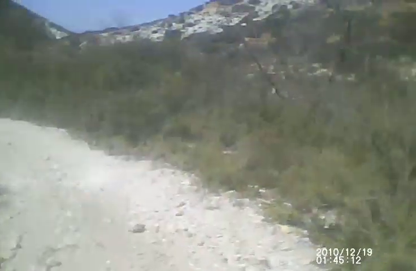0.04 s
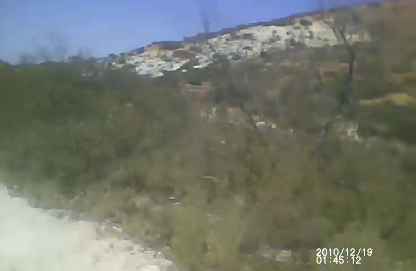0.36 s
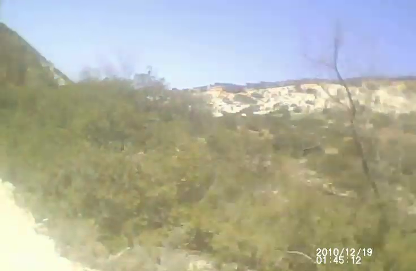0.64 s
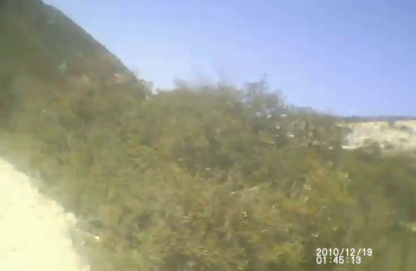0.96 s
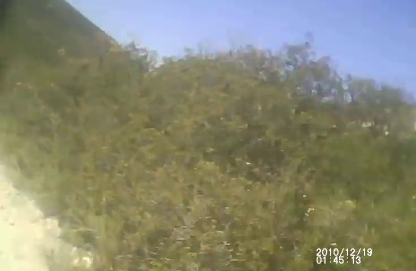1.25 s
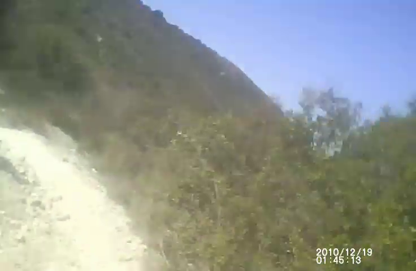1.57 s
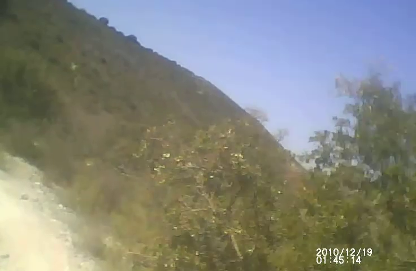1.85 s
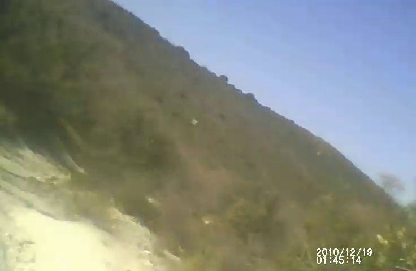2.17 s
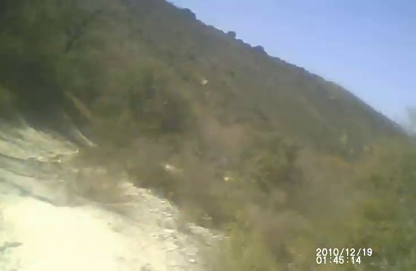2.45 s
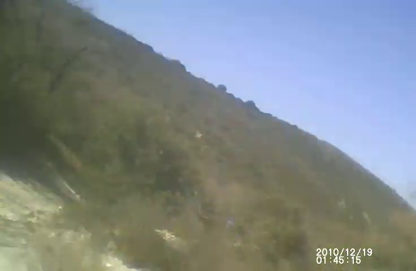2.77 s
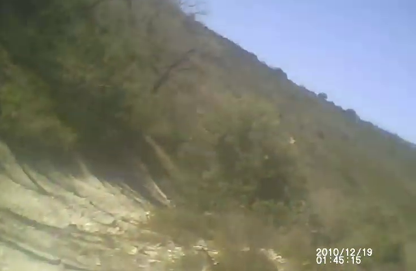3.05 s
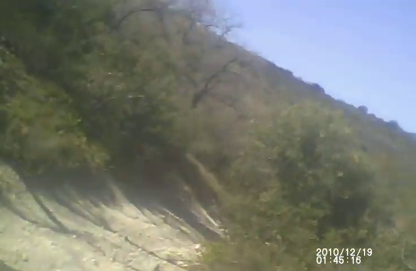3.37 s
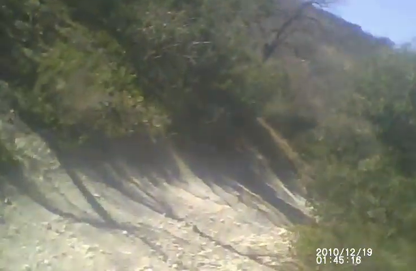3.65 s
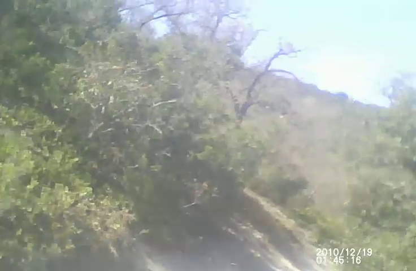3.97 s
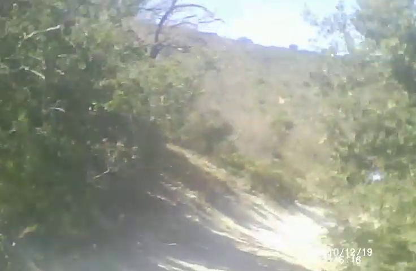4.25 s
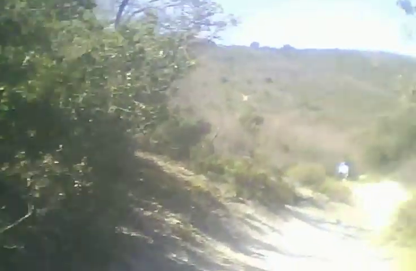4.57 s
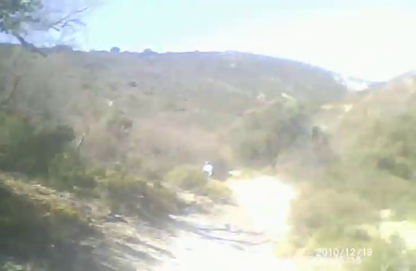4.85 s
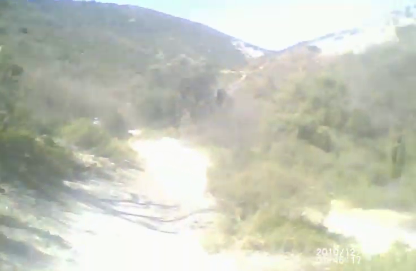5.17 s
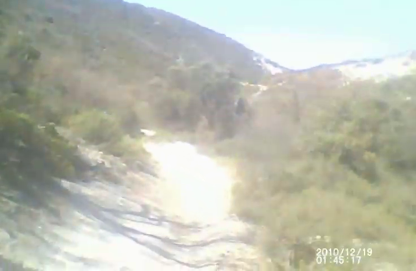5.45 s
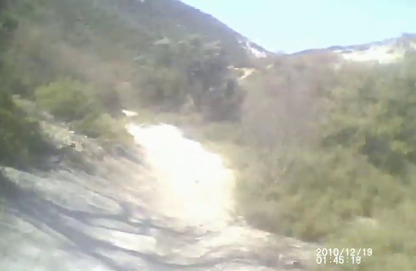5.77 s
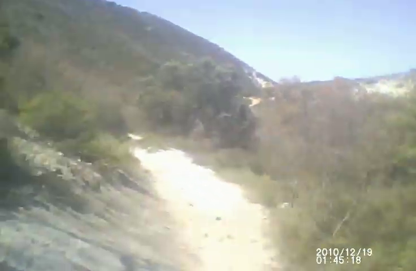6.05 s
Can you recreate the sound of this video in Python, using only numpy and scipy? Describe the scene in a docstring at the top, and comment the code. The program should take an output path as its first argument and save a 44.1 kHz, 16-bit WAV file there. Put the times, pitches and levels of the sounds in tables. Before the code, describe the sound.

A bike rolls down a rocky trail for about six seconds, heard from a small camera fixed to it. From the start, loose parts chatter rapidly against the hollow housing, mixed with tiny metal ticks. The shaking mount adds a low, boxy drone, and faint wind rushes steadily behind. Stones give sharp, irregular knocks several times a second, each a clack with a brief ring and scrape; strong ones land around 0.4, 2.1, 2.8, 4.4 and 5.5 seconds. The rattle is busy through the first second and a half, thins just before 2 seconds, then builds again. At about 3.4 seconds the sound drops out for a split second. After a short easing around 5 seconds, the drone and clatter grow, with the hardest jolt near 6 seconds. The microphone is close, narrow in tone and overdriven, so the bumps crackle.

```python
"""A crackling rattle over a low drone: a bike rolls down a rocky trail with a small camera fixed to it.
Loose parts chatter against the housing, single stones give sharper knocks, and the shaking mount drones.
Rough patches shake mount and parts harder for a moment, while wind rushes over the microphone.
The narrow-band microphone stage is overdriven, so the jolts crackle. Once, the sound briefly drops out."""
import sys
import numpy as np
from scipy import signal
from scipy.fft import rfft, irfft, next_fast_len
from scipy.io import wavfile
from scipy.ndimage import uniform_filter1d, map_coordinates

SR = 44100
rng = np.random.default_rng(int(sys.argv[2]) if len(sys.argv) > 2 else 0)


def pcm_store(signal):
    """Save signal as 16-bit PCM."""
    levels = np.round(np.clip(np.atleast_2d(signal), -1, 1) * 32767)
    wavfile.write(sys.argv[1], SR, levels.astype(np.int16).T)


N = 269892


# The housing's hollow answer to a tap. Each row: frequency in Hz, relative level in dB.
HOUSING_SPECTRUM = [(200, -36.5), (450, -3), (630, 4.5), (950, 2.5), (1150, -0.5), (1450, -10),
                    (1950, -8.5), (2350, -19), (2650, -14), (2900, -25), (3500, -21.5), (4100, -43)]

def chatter(level_db, taps_per_s, scatter_db, contact_s, count=4000):
    """Loose parts tap the housing at uneven intervals, each tap a short scuff."""
    spacing, force = rng.random((count, 2)).T
    at = (np.cumsum(.15 + 1.7 * spacing) / taps_per_s * SR).astype(int)
    energy = amp(scatter_db * (2 * force - 1)) ** 2
    taps = np.bincount(at[at < N], energy[at < N], N)
    decay = np.exp(-2 / (contact_s * SR))
    scuffs = np.sqrt(signal.lfilter([1], [1, -decay], taps))
    pushes = shifting_colour(scuffs * rng.standard_normal(N), depth_db=7)
    return amp(level_db) * unit(ring(pushes, HOUSING_SPECTRUM))


def shifting_colour(x, depth_db, size=256):
    """Each tap lands on another spot, so the colour changes from one to the next."""
    spectra = signal.stft(x, nperseg=size)[2]
    colour = uniform_filter1d(rng.standard_normal(spectra.shape), size=4, axis=0)
    colour = uniform_filter1d(colour, size=2, axis=1)
    return signal.istft(spectra * amp(depth_db * np.tanh(unit(colour))), nperseg=size)[1][:N]


def frame_pings(level_db, ticks_per_s, centre_hz, spread, scatter_db, t60_s, count=600):
    """Small metal parts tick against the frame, each ringing briefly at its own pitch."""
    spacing, pitch, softness = rng.random((count, 3)).T
    times = np.cumsum(-np.log(1 - spacing)) / ticks_per_s
    t = np.arange(SR // 20) / SR
    hz = centre_hz * np.exp(spread * (2 * pitch[:, None] - 1))
    ticks = amp(-scatter_db * softness[:, None] - 60 * t / t60_s) * np.sin(2 * np.pi * hz * t)
    at = (times[:, None] * SR).astype(int) + np.arange(len(t))
    return amp(level_db) * unit(np.bincount(at[at < N], ticks[at < N], N))


# Rough ground under the wheels. Each row: start in seconds, length in seconds,
# relative rattle level in dB, relative mount sway in dB.
ROUGH_PATCHES = [(0.039, 0.12, -4.5, -5.5), (0.268, 0.026, -6, -10.5), (0.322, 0.12, -1, -2),
                 (0.513, 0.16, -10, -7), (0.711, 0.085, -8.5, -6.5), (0.983, 0.14, -6, -1),
                 (1.145, 0.047, -2.5, -7.5), (1.266, 0.05, -5.5, -6), (1.465, 0.037, -7, -9),
                 (1.546, 0.13, -12.5, -21.5), (1.82, 0.041, -19.5, -8), (1.914, 0.017, -8, -17),
                 (2.097, 0.027, -10.5, -10.5), (2.221, 0.036, -8.5, -16.5), (2.42, 0.048, -7.5, -8.5),
                 (2.512, 0.1, -6.5, -8.5), (2.737, 0.2, -7.5, -5.5), (2.953, 0.062, -15, -5),
                 (3.138, 0.035, -11.5, -9.5), (3.325, 0.041, -5.5, -11.5), (3.445, 0.155, -5.5, -7),
                 (3.652, 0.045, -9, -14), (3.885, 0.0061, -4, -12.5), (3.917, 0.027, -14.5, -3.5),
                 (4.02, 0.13, -5, -5.5), (4.219, 0.245, -6.5, -7.5), (4.6, 0.074, -4.5, -4.5),
                 (4.759, 0.11, -15, -4.5), (5.2, 0.018, -10, -7), (5.286, 0.027, -7.5, -12.5),
                 (5.419, 0.069, -8, -9), (5.495, 0.066, -2, -3), (5.647, 0.066, -5, -8.5),
                 (5.797, 0.035, -5, -11.5), (5.939, 0.085, 1.5, 2)]

def jolts(levels_db, attack_s=0.0078, release_s=0.011):
    """Strength of the rough patches: each takes hold, lasts for its length and dies away."""
    t = np.arange(N) / SR
    strength = np.zeros(N)
    for (start, length, *_), db in zip(ROUGH_PATCHES, levels_db):
        attack = np.clip((t - start) / attack_s + .5, 0, 1)
        release = np.exp(-np.maximum(t - start - length, 0) / release_s)
        strength = np.maximum(strength, amp(db) * attack * release)
    return strength


# The bed of rattle between bumps. Each row: time in seconds, relative level in dB.
RATTLE_BED = [(0.0, -10), (0.34, -14), (0.49, -13.5), (1.1, -15.5), (1.88, -20), (2.7, -10), (3.25, -16),
              (3.57, -13), (3.89, -14.5), (4.25, -10), (4.98, -19), (5.5, -8.5), (5.91, -16.5),
              (6.1, -12.5)]

def jostle(steady_db):
    """How hard the loose parts are thrown about: the trail's steady grain plus its rough patches."""
    rattle_db = np.array(ROUGH_PATCHES)[:, 2]
    return np.hypot(amp(curve(RATTLE_BED) + steady_db), jolts(rattle_db))


# The bite of hard edges scraping. Each row: frequency in Hz, relative level in dB.
SCRAPE_SPECTRUM = [(600, -44), (1400, 3.5), (2000, 4.5), (2700, 3.5), (3100, -6), (4000, -13)]
# Single stone hits. Each row: start in seconds, relative level of clack and ring in dB,
# ring pitch in Hz, relative scrape level in dB.
STONE_HITS = [(0.032, -3.5, 620, -5.5), (0.095, -3.5, 830, -0.5), (0.201, -4.5, 830, -15),
              (0.412, -1, 780, 2), (0.573, -0.5, 892, -10.5), (0.673, -14.5, 870, -12),
              (0.756, -4.5, 620, -13), (0.881, -12, 1200, -9.5), (0.943, -11.5, 790, -10),
              (0.994, -4.5, 894, -11), (1.152, -3, 734, -5), (1.277, -3, 708, -17), (1.351, -8.5, 672, -24),
              (1.55, -10, 626, -21), (1.908, 0.5, 937, -17), (2.036, -6.5, 946, -4),
              (2.093, 3.5, 1152, -6.5), (2.221, -2, 884, -17.5), (2.46, -8, 1010, 2.5),
              (2.808, -1.5, 763, -4.5), (3.177, -6.5, 727, -4), (3.368, -3.5, 1167, -12),
              (3.428, -6, 976, -14.5), (3.837, -3.5, 690, -16.5), (3.887, -1, 685, -12),
              (3.939, -2, 590, -17.5), (4.02, -3.5, 700, -6.5), (4.124, -8.5, 658, -12.5),
              (4.209, -4.5, 923, -8.5), (4.424, -4, 795, 2), (4.525, -0.5, 830, -14.5),
              (4.71, -7.5, 878, -30), (4.769, -6.5, 690, -17.5), (4.852, -5, 686, -23),
              (4.944, -6, 946, -18.5), (5.094, -8, 713, -24), (5.136, -6, 963, -17.5),
              (5.381, -4, 716, -11), (5.538, 0.5, 696, -1), (5.779, -7.5, 1014, -16),
              (5.979, -8.5, 940, 8.5)]

def stone_knocks(clack_db, tone_db, scrape_db, attack_s, t60_s):
    """A stone slams the parts together: a clack of the housing, a brief ring and a bright scrape."""
    t = np.arange(SR // 8) / SR
    clack = ringing_noise(HOUSING_SPECTRUM)
    scrape = ringing_noise(SCRAPE_SPECTRUM)
    blow = (1 - np.exp(-t / attack_s)) * amp(-60 * t / t60_s)
    knocks = np.zeros(N)
    for start, body_db, hz, bright_db in STONE_HITS:
        span = round(start * SR) + np.arange(len(t))
        body = amp(clack_db) * clack[span] + amp(tone_db) * np.sin(2 * np.pi * hz * t)
        knocks[span] += blow * (amp(body_db) * body + amp(bright_db + scrape_db) * scrape[span])
    return knocks


def slack(lull_db, lull_s):
    """Just before each knock the bike goes light for an instant and its shaking slackens."""
    t = np.arange(N) / SR
    hits = np.append(np.sort(np.array(STONE_HITS)[:, 0]), np.inf)
    until_hit = hits[np.searchsorted(hits, t)] - t
    return amp(lull_db * np.exp(-(until_hit / lull_s) ** 2))


# The mount's low, boxy tone. Each row: frequency in Hz, relative level in dB.
MOUNT_SPECTRUM = [(25, -20.5), (55, -30.5), (100, -10), (150, -4.5), (200, 0.5), (235, 0), (265, -0.5),
                  (295, -4.5), (350, -12), (480, -19.5), (900, -59)]
# The bed of shaking between bumps. Each row: time in seconds, relative level in dB.
SHAKE_BED = [(0.0, -11), (1.22, -12.5), (2.65, -15), (2.85, -17), (3.23, -13), (3.41, -9), (3.77, -13),
             (4.77, -10.5), (5.03, -13.5), (5.21, -14), (5.64, -7), (6.1, -8.5)]

def mount_drone(steady_db, bump_db, evenness, swell_s):
    """The trail shakes the mount, whose springiness keeps the swing fairly even."""
    swing = ringing_noise(MOUNT_SPECTRUM)
    power = np.abs(uniform_filter1d(swing ** 2, int(swell_s * SR) + 1)) + 1e-6
    sway_db = np.array(ROUGH_PATCHES)[:, 3]
    strength = np.hypot(amp(curve(SHAKE_BED) + steady_db), jolts(sway_db + bump_db))
    return strength * unit(swing / power ** (evenness / 2))


# The swell and fade of the mount's hum. Each row: time in seconds, relative level in dB.
HUM_SWELL = [(0, -14.5), (1.1, -12), (2.0, -12.5), (2.6, -35.5), (4.1, -22), (4.8, -11), (5.2, -22.5),
             (5.8, -15)]

def mount_hum(centre_hz, width_hz):
    """The mount's sharpest resonance keeps singing between the jolts."""
    tone = filtered(rng.standard_normal(N), lambda hz: 1 / (1 + ((hz - centre_hz) / width_hz) ** 2))
    return amp(curve(HUM_SWELL)) * unit(tone)


# The colour of rushing air. Each row: frequency in Hz, relative level in dB.
WIND_SPECTRUM = [(30, -13.5), (200, 1.5), (450, 0.5), (1000, 12), (1450, -11.5), (2600, -3), (4000, -62)]

def wind(level_db):
    """Air flows steadily over the microphone, with slow gusts and quick eddies."""
    gusts_db = 1.2 * wobble(3) + 1.5 * wobble(40)
    return amp(level_db + gusts_db) * ringing_noise(WIND_SPECTRUM)


def amp(db):
    """Decibels to gain."""
    return 10 ** (np.asarray(db) / 20)


def unit(x):
    """Scale to rms 1."""
    return x / np.sqrt(np.mean(x ** 2) + 1e-20)


def gain_at(spectrum, hz):
    """Gain along (Hz, dB) rows, joined on a log frequency axis."""
    points_hz, db = np.transpose(spectrum)
    return amp(np.interp(np.log(hz + 1), np.log(points_hz + 1), db))


def curve(rows):
    """(seconds, value) rows to one value per sample."""
    return np.interp(np.arange(N) / SR, *np.transpose(rows))


def wobble(knots_per_s):
    """A smooth random curve."""
    knots = rng.standard_normal(int(N * knots_per_s / SR) + 4)
    return map_coordinates(knots, [np.arange(N) * knots_per_s / SR])


def filtered(x, response):
    """Shape x with a gain that depends on frequency."""
    size = next_fast_len(N + SR // 2)
    return irfft(rfft(x, size) * response(np.fft.rfftfreq(size, 1 / SR)), size)[:N]


def ring(x, spectrum, size=4096):
    """Send x through a body with this spectrum; it rings only after each push (minimum phase)."""
    cepstrum = irfft(np.log(gain_at(spectrum, np.fft.rfftfreq(size, 1 / SR))))
    cepstrum[1:size // 2] *= 2
    cepstrum[size // 2 + 1:] = 0
    impulse_response = irfft(np.exp(rfft(cepstrum)))
    return signal.fftconvolve(x, impulse_response)[:N]


def ringing_noise(spectrum):
    """Steady noise in the colour of this spectrum, at rms 1."""
    return unit(ring(rng.standard_normal(N), spectrum))


def scene():
    """Rattle, knocks and drone up front and wind behind, all at one microphone."""
    drone = mount_drone(steady_db=0.02, bump_db=-0.5, evenness=0.8, swell_s=0.057)
    hum = mount_hum(centre_hz=258.3, width_hz=13.6)
    # small parts buzz quickly; heavier ones clatter at a slower pace
    buzz = chatter(level_db=-5.0, taps_per_s=220, scatter_db=4.5, contact_s=0.0042)
    clatter = chatter(level_db=-3.5, taps_per_s=85, scatter_db=3.0, contact_s=0.0039)
    pings = frame_pings(level_db=-15, ticks_per_s=60, centre_hz=2358, spread=0.2,
                        scatter_db=9.5, t60_s=0.0083)
    rattle = (buzz + clatter + pings) * jostle(steady_db=1.14) * slack(lull_db=-5.5, lull_s=0.011)
    stones = stone_knocks(clack_db=3.5, tone_db=2.5, scrape_db=0.5, attack_s=0.0004, t60_s=0.045)
    shaking = (drone + hum) * slack(lull_db=-3, lull_s=0.018)
    return (rattle + stones + shaking + wind(level_db=-22.5))[None]


def overdrive(x, ceiling, hardness):
    """The microphone stage saturates, flattening the peaks at its ceiling."""
    return x / (1 + np.abs(x / ceiling) ** hardness) ** (1 / hardness)


# A split-second hole in the sound. One row: start in seconds, end in seconds, gain in dB.
LEVEL_DIP = (3.409, 3.427, -25)
# The tone of the output stage. Each row: frequency in Hz, gain in dB.
OUTPUT_EQ = [(25, -4), (70, 1), (4000, -1), (4700, -6.5), (7500, 1), (16000, -4.5)]

def record(dry, mic_hz=4000, top_hz=15900):
    """The sound dips once, saturates and is band-limited; clipping what overshoots adds the crackle."""
    start, end, dip_db = LEVEL_DIP
    t = np.arange(N) / SR
    dipped = dry[0] * amp(dip_db * ((t > start) & (t < end)))
    driven = overdrive(dipped, ceiling=0.79, hardness=3.8)
    narrow = filtered(driven, lambda hz: 1 / np.sqrt(1 + (hz / mic_hz) ** 44))  # steep low-pass
    clipped = np.clip(narrow, -.69, .69)
    return filtered(clipped, lambda hz: gain_at(OUTPUT_EQ, hz) * (hz < top_hz))[None]


dry = scene()
out = record(dry)
pcm_store(out)
```